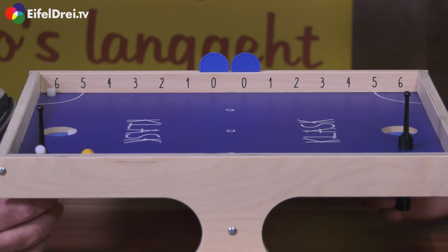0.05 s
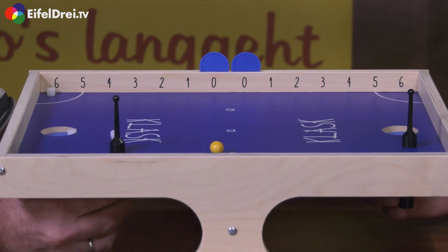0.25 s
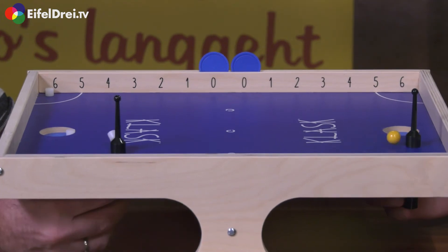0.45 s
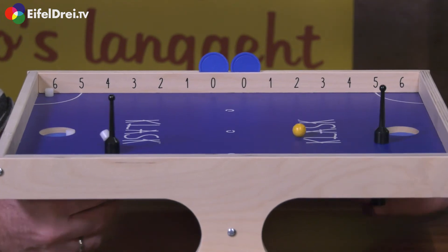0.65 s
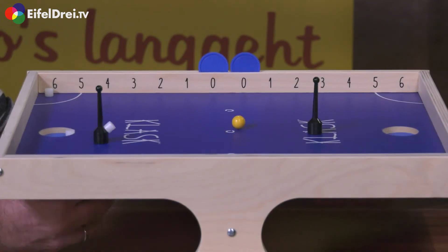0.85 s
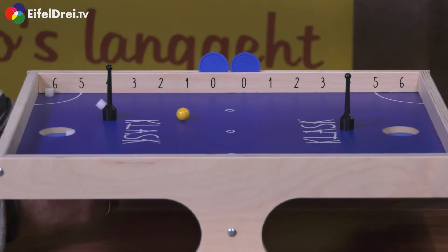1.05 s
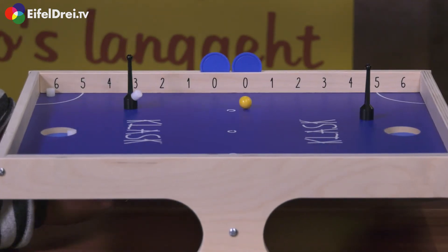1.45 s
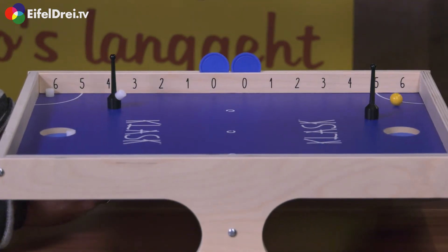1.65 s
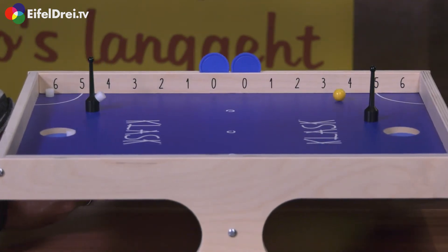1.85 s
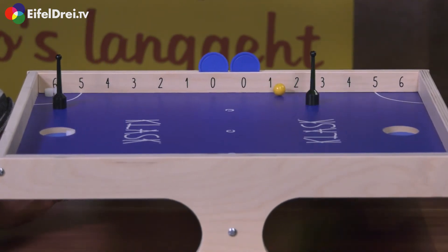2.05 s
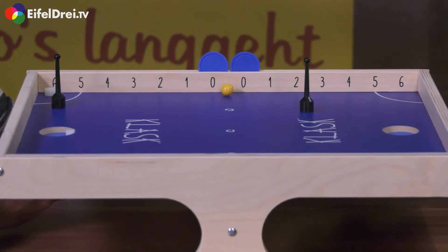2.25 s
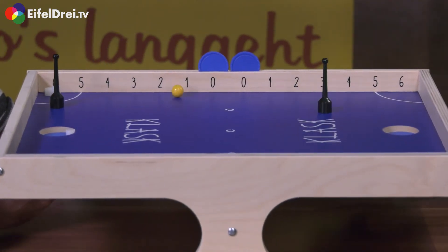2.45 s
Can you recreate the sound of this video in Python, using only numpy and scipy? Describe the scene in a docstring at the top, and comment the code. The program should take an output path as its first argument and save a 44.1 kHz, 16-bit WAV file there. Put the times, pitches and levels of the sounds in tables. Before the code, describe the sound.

A small plastic ball is knocked around a wooden tabletop game in a quiet room. A striker scrapes at 0.2 seconds, then the ball skips and cracks sharply around 0.6, bouncing on as the hollow board booms softly. Scrapes run from 0.8 to 1.5, with a tiny squeak. Hard knocks land at 1.4 and 1.8 amid bounces and rolling. More scraping follows from 2.0, fading by 2.5.

```python
"""In a quiet room, a small plastic ball is knocked about a wooden tabletop game.
The magnet-held strikers stick and slip across the board in short scrapes, sometimes squeaking.
The ball rolls with a fine ticking while the hollow board booms under it. It cracks against
strikers and walls and skips in quick bounces; each hit is a short clatter plus the board's ring."""
import sys
import numpy as np
from scipy import signal
from scipy.fft import rfft, irfft
from scipy.io import wavfile
from scipy.ndimage import uniform_filter1d

SR = 44100
rng = np.random.default_rng(int(sys.argv[2]) if len(sys.argv) > 2 else 0)


def materialize(psi):
    """Save the field psi as 16-bit PCM at rate SR to the path in sys.argv[1].

    A 1-D psi becomes a single channel; in a 2-D psi each row is a channel.
    """
    bounded = np.clip(np.atleast_2d(psi).T, -1, 1)
    quanta = np.round(bounded * 32767).astype(np.int16)
    wavfile.write(sys.argv[1], SR, quanta)


N = 114660
TIME = np.arange(N) / SR
HZ = np.fft.rfftfreq(4096, 1 / SR)  # the frequencies at which tone colours are set


def amp(db):
    """Turns decibels into a volume multiplier."""
    return 10 ** (np.asarray(db) / 20)


def unit(x):
    """Scales a signal to an average (rms) size of 1."""
    return x / np.sqrt(np.mean(x ** 2) + 1e-20)


def curve(points, hz=HZ):
    """Joins (frequency, value) points into a curve, giving each octave about equal room."""
    freq, value = np.transpose(points)
    return np.interp(np.log(hz + 1), np.log(freq + 1), value)


def add(mix, start_s, sound):
    """Adds a sound to the mix at the given time."""
    part = mix[max(round(start_s * SR), 0):][:len(sound)]
    part += sound[:len(part)]


def colour(x, db):
    """Turns each frequency up or down by db, with no ringing ahead of the sound."""
    log_gain = np.log(amp(np.r_[db, db[-2:0:-1]]))
    response = np.exp(np.conj(signal.hilbert(log_gain)))
    taps = np.fft.ifft(response).real
    return signal.fftconvolve(x, taps[:len(db)])[:len(x)]


def wobble(rate_hz):
    """A smooth random wavering, mostly slower than rate_hz."""
    freq = np.fft.rfftfreq(N, 1 / SR)
    return unit(irfft(rfft(rng.standard_normal(N)) / (1 + (freq / rate_hz) ** 4), N))


def resonance(hz, width_hz):
    """Noise that rings around one pitch; the narrower, the more like a note."""
    freq = np.fft.rfftfreq(N, 1 / SR)
    return unit(irfft(rfft(rng.standard_normal(N)) / (1 + (2 * (freq - hz) / width_hz) ** 2), N))


def clicks(per_s, spread_db):
    """Tiny clicks of uneven size at random times."""
    size = amp(spread_db * np.minimum(rng.exponential(1, N), 4))
    return size * rng.choice([-1, 1], N) * (rng.random(N) < per_s / SR)


# tone colour of the room's air (frequency [Hz], relative level [dB])
AIR_COLOUR = [(15, -39), (25, -5.5), (59, -19.5), (86, -8.5), (122, -13), (173, -14), (240, -13.5),
              (305, -20), (871, -26), (1620, -17), (5430, -40), (15500, -39)]
# the notes of the hum (pitch [Hz], starting level [dB], final level [dB])
HUM_NOTES = [(56.4, -63, -66), (98.6, -72, -62.5), (123, -61.5, -78)]
def room_air(air_db=-58, hiss_db=-69, waver_rad=0.76, sway_db=2.5, side_db=-20):
    """Quiet air, slightly different in each ear, with a wavering low hum and a faint hiss."""
    hum = np.zeros(N)
    for hz, first_db, last_db in HUM_NOTES:
        level = amp(np.linspace(first_db, last_db, N) + sway_db * wobble(5.0))
        hum += level * unit(np.sin(2 * np.pi * hz * TIME + waver_rad * wobble(5.9)))
    middle, side = (unit(colour(noise, curve(AIR_COLOUR))) for noise in rng.standard_normal((2, N)))
    air = middle + amp(side_db) * np.array([side, -side])
    return hum + amp(air_db) * air + amp(hiss_db) * rng.standard_normal((2, N))


# striker squeaks (time [s], length [s], pitch [Hz], level [dB])
SQUEAK_EVENTS = [(0, 0.16, 1590, -59.5), (1.306, 0.016, 2857, -24.5), (2.369, 0.0065, 2860, -40),
                 (2.519, 0.086, 2436, -46.5)]
def squeaks(width_hz=220, overtone_db=-15):
    """Now and then a sliding striker locks onto one pitch, with a weaker one a fifth above."""
    out = np.zeros(N)
    for start, length, hz, db in SQUEAK_EVENTS:
        swell = signal.windows.tukey(round(length * SR), .5)
        tone = resonance(hz, width_hz) + amp(overtone_db) * resonance(1.5 * hz, width_hz)
        add(out, start, amp(db) * swell * unit(tone[:len(swell)]))
    return out


# how loud the board booms (time [s], level [dB])
BOOM_LEVELS = [(.1, -72.5), (.25, -72), (0.32, -43.5), (0.52, -61), (.66, -55), (.8, -55), (.92, -47),
               (1.05, -51.5), (1.2, -65.5), (2.6, -68.5)]
# the hollow board's own notes (pitch [Hz], width [Hz], relative level [dB])
BOARD_NOTES = [(298, 25, -9), (407.4, 40.5, 3.5), (594, 280, 2.5)]
def board_boom():
    """The hollow board booms under the rolling ball."""
    level_db = np.interp(TIME, *np.transpose(BOOM_LEVELS))
    return amp(level_db) * unit(sum(amp(db) * resonance(hz, width) for hz, width, db in BOARD_NOTES))


def patchy(x, depth_db):
    """Random pitches swell and fade, as they do when a striker moves over the board."""
    spectrum = signal.stft(x, nperseg=512, noverlap=384)[2]
    patches = uniform_filter1d(rng.standard_normal(spectrum.shape), size=3, axis=0)  # blur in pitch
    patches = uniform_filter1d(patches, size=7, axis=1)  # blur in time
    return signal.istft(spectrum * amp(depth_db * unit(patches)), nperseg=512, noverlap=384)[1][:N]


# one list of points per striker stroke; the last three columns are added to the level
# (time [s], level [dB], low rub [dB], higher rasp [dB], gritty treble [dB])
STRIKER_STROKES = [
    [(0.15, -55, -19, -15, -16), (0.205, -43.5, -10, -0.5, -16), (0.235, -36, -2.5, 3, -1),
     (0.26, -28, -6, -2.5, -4.5), (0.28, -22.5, -17, -11, -15), (0.3, -29, -15, -5.5, -19),
     (0.32, -33, -12.5, 3, -16), (0.36, -54.5, 14.5, -4, -13)],
    [(0.568, -54, -20, -6, -8), (0.58, -30, -30, -9, -6), (0.6, -37, -7, -10, 5),
     (0.614, -49.5, 2, -9, -13), (0.638, -26.5, -17, -3, -23), (0.66, -45, -19, -6, -10)],
    [(0.81, -42.5, 0, 6, -21), (0.842, -26.5, -9.5, -2.5, -3), (0.872, -30, -5.5, -5, -11),
     (0.895, -22, -10, -12.5, -7.5), (0.925, -29, -4.5, -1.5, -17.5), (1.0, -40.5, -14, 0, -14.5)],
    [(1.0, -34, -13, 0, -22), (1.02, -28.5, -12, -2.5, -11), (1.035, -19.5, -20, -10.5, -22.5),
     (1.064, -27, -3, -3.5, -12), (1.09, -22.5, -12, -14.5, -17), (1.14, -29, -9.5, -0.5, -12.5),
     (1.166, -20, -24.5, -10, -18.5), (1.188, -32.5, -14, -11, -28)],
    [(1.188, -30.5, -11, -5, -21), (1.206, -28, -27, -6, -13.5), (1.23, -34.5, -21, -4, -19.5),
     (1.27, -21.5, -38, -9, -28), (1.282, -34, -28, 4.5, -17.5), (1.318, -23.5, -34, -12, -29),
     (1.336, -33, -18, -6, -25), (1.38, -40, -11, -0.5, -13.5), (1.408, -26.5, -6, -6, -0.5)],
    [(1.414, -22, -13, -5, 4.5), (1.44, -35.5, -1.5, -15, -1.5), (1.495, -31.5, -10.5, -0.5, -14),
     (1.56, -50, -4, 1, -17)],
    [(2.018, -49, -4, 3, -10), (2.04, -23.5, -10, -8, -13.5), (2.06, -32, -8, -5, -16.5),
     (2.08, -22.5, -18, -4, -7.5), (2.125, -17.5, -19, -13, -19), (2.143, -30, -7.5, -8, -14),
     (2.178, -22, -13, -13.5, -24.5), (2.21, -39.5, -25, 5.5, -19)],
    [(2.21, -39, -27, -4, -18), (2.25, -36, -1, -24, -15), (2.275, -37, 3.5, 2, -7.5),
     (2.305, -40.5, 2, -2, -13), (2.328, -36, -21, 4.5, -4.5), (2.352, -54, -28, 7, -24),
     (2.395, -43.5, -40, 1.5, -15), (2.5, -57, -15, 2, -17)],
]
# very high fizz, one value per stroke (level compared with the grit [dB])
STROKE_FIZZ = [-11, -26, -15.5, -23, -20, -18.5, -11, -13]
# tone colours of the five layers of a scrape (frequency [Hz], relative level [dB])
BODY_COLOUR = [(500, -47.5), (900, -24), (1130, -7.5), (1350, -2), (1490, 0), (1610, 8), (1740, -0.5),
               (1950, -9), (2900, -21), (6000, -57), (12000, -89)]
RUB_COLOUR = [(100, -43), (300, -33), (500, -7), (700, -8.5), (850, 3), (1080, 11.5), (1400, 0.5),
              (3000, -67)]
RASP_COLOUR = [(1200, -32), (1950, -6.5), (2380, 2), (2650, -5), (2950, -4.5), (3500, -15), (6000, -28),
               (12000, -65)]
GRIT_COLOUR = [(2000, -13.5), (3400, 13.5), (4500, 12), (5500, 9), (6600, -5), (9000, -26), (14000, -56)]
FIZZ_COLOUR = [(4500, -14), (6500, 3.5), (9300, 0.5), (10500, -11), (12500, -11), (15500, -33)]
def scraping(body_db=-3.0, rub_db=-2, rasp_db=-3, grit_db=-4, fade_s=0.0081, chatter_db=1.52):
    """The strikers stick and slip on the board, chattering as they slide."""
    levels = np.zeros((5, N))
    for stroke, fizz in zip(STRIKER_STROKES, STROKE_FIZZ):
        times, db, rub, rasp, grit = np.transpose(stroke)
        fade = np.clip(np.minimum(TIME - times[0], times[-1] - TIME) / fade_s + .5, 0, 1)
        offsets = (body_db, rub + rub_db, rasp + rasp_db, grit + grit_db, grit + grit_db + fizz)
        levels += fade * amp([np.interp(TIME, times, db + offset) for offset in offsets])
    chatter = amp(chatter_db * wobble(rate_hz=109))
    out = np.zeros(N)
    for level, shape in zip(levels, (BODY_COLOUR, RUB_COLOUR, RASP_COLOUR, GRIT_COLOUR, FIZZ_COLOUR)):
        slips = patchy(clicks(per_s=9000, spread_db=2) * chatter, depth_db=2.5)
        out += level * unit(colour(slips, curve(shape)))
    return out


# how loud the ball rolls (time [s], level [dB])
ROLL_LEVELS = [(.17, -88), (.33, -38.5), (.55, -47), (.8, -41.5), (1.3, -48), (1.548, -40.5),
               (1.691, -48.5), (1.8, -47), (1.941, -42), (2.02, -42.5), (2.4, -49.5), (2.52, -54),
               (2.6, -47)]
# tone colour of its ticking (frequency [Hz], relative level [dB])
TICK_COLOUR = [(200, -41), (420, -20.5), (800, -16.5), (1100, -3), (1600, -6.5), (2150, -3.5), (2450, -4.5),
               (2950, -4), (3500, -10), (5000, -32), (9000, -39.5)]
def rolling():
    """The rolling ball ticks finely on the board."""
    level_db = np.interp(TIME, *np.transpose(ROLL_LEVELS))
    ticks = clicks(per_s=1500, spread_db=5)
    return amp(level_db) * unit(colour(ticks, curve(TICK_COLOUR)))


def hit(shape_db, decay_s, ring_db, rise_s=0.00057, hold_s=0.0015,
        ring_hz=1640, ring_rise_s=0.0012, ring_decay_s=.032):
    """Plastic meets wood: a brief clatter and the board's main note. A decay is a 60 dB fade."""
    t = np.arange(len(HZ)) / SR
    fall = amp(-60 * np.maximum(t - hold_s, 0) / decay_s)
    burst = rng.standard_normal(len(t)) * fall * np.minimum(t / rise_s, 1)
    spectrum = rfft(burst, 2 * len(t))
    spectrum /= np.sqrt(uniform_filter1d(abs(spectrum) ** 2, size=45) + 1e-12)  # even out chance peaks
    clatter = colour(irfft(spectrum)[:len(t)], shape_db)
    clatter /= np.sqrt(np.sum(clatter ** 2) / (SR * .006)) * 3  # same energy whatever the colour
    pitch = ring_hz * (1 + 0.024 * rng.standard_normal())
    ring = np.sin(2 * np.pi * pitch * t) * amp(-60 * t / ring_decay_s)
    return clatter + amp(ring_db) * ring * (1 - np.exp(-t / ring_rise_s))


# hard knocks (time [s], level [dB], woody boost [dB], board ring [dB], treble boost [dB],
# top edge [Hz], decay [s])
KNOCK_EVENTS = [(0.2436, -23, -10, -21, 5, 10000, .03), (0.5398, -17.5, -27, 10, -8, 6660, 0.019),
                (0.5954, -11, -4, 0.5, 1.5, 6030, 0.029), (0.6416, -11.5, 1, -3, -1.5, 6600, 0.029),
                (0.6515, -25, -8, 0, 7, 7100, 0.013), (1.4121, -11.5, 6, 3, -10, 11000, 0.029),
                (1.4201, -10.5, 23, -1, -25, 11000, 0.047), (1.4331, -15, 18.5, 1, -9, 10000, 0.016),
                (1.7771, -9, -12, -34, 3.5, 8600, 0.02), (1.7857, -20, 20, -16, 9, 9300, 0.086)]
# basic tone colour of a knock (frequency [Hz], relative level [dB])
CRACK_COLOUR = [(200, -48), (400, -23.5), (700, -15), (1200, -14.5), (1700, -5), (2500, 0), (3600, -7),
                (4700, -3.5), (7500, -11.5), (10500, -17), (16000, -28)]
# where the woody and treble boosts act (frequency [Hz], share of the boost [0 to 1])
WOODY_SHARE = [(150, 0.39), (400, 0.047), (650, 0.37), (1100, 1), (1800, 0.012)]
TREBLE_SHARE = [(3000, 0), (4500, 1)]
def knocks(ring_db=-7, edge_steepness=17.4, edge_floor_db=-26, bass_cut_hz=460):
    """The ball cracks against a striker or the wooden wall; the thin wood gives no bass."""
    out = np.zeros(N)
    for start, db, woody, ring, treble, edge_hz, decay_s in KNOCK_EVENTS:
        top_cut = 20 * np.log10(1 / (1 + (HZ / edge_hz) ** edge_steepness) + amp(edge_floor_db))
        shape = curve(CRACK_COLOUR) + woody * curve(WOODY_SHARE) + treble * curve(TREBLE_SHARE) + top_cut
        add(out, start, amp(db) * hit(shape, decay_s, ring + ring_db))
    return signal.sosfilt(signal.butter(3, bass_cut_hz, "high", fs=SR, output="sos"), out)


# the ball's landings (time [s], level [dB], board ring [dB], treble [dB])
BOUNCE_EVENTS = [(0.3457, -24.5, -31, -8), (0.3644, -21.5, -30, -17), (0.3791, -26, -34, -23),
                 (0.396, -18.5, -17, -27), (0.41, -22.5, -27, -55), (0.4253, -21, -24, -20),
                 (0.4408, -19.5, -26, -19), (0.4537, -25, -3, -16), (0.468, -26.5, 1, -13),
                 (0.493, -26.5, 7, -19), (0.5064, -24.5, -31, -14), (0.5228, -23, -5, -14),
                 (0.6813, -13, 0.5, -11.5), (0.714, -14.5, 0.5, -11), (0.7426, -16, -0.5, -8),
                 (0.7632, -16, -2.5, -15.5), (0.782, -18.5, -21.5, -19.5), (0.8, -20.5, -4, -22),
                 (0.826, -23, -12, -29), (0.8885, -34, -17, 1), (1.4549, -17.5, -16, -9),
                 (1.6281, -24.5, -17, -21), (1.6482, -23, -20, -22), (1.724, -22.5, -29, -29),
                 (1.7393, -28, -23, -24), (1.7488, -24, -40, -20), (1.7641, -22, -22, -11),
                 (1.8198, -13.5, -16, -19), (1.8457, -18, -37, -24), (1.868, -15, -25, -9.5),
                 (1.8861, -20.5, -2.5, -20), (2.1968, -19, -28, -13), (2.3768, -24.5, -1, -45)]
# basic tone colour of a landing (frequency [Hz], relative level [dB])
LANDING_COLOUR = [(100, -32.5), (400, -21.5), (800, -12.5), (1200, -20), (1800, -6.5), (2400, 3.5),
                  (3050, 2), (3600, -5), (5000, -11.5), (6500, -28.5), (16000, -70)]
def bounces(level_db=-1.0, ring_db=-2, treble_db=16):
    """The ball skips over the board, each landing a short hit."""
    out = np.zeros(N)
    for start, db, ring, treble in BOUNCE_EVENTS:
        shape = curve(LANDING_COLOUR) + (treble + treble_db) * curve(TREBLE_SHARE)
        add(out, start, amp(db + level_db) * hit(shape, decay_s=0.02, ring_db=ring + ring_db))
    return out


def snap(start_s=0.5405, db=-38, decay_s=0.015):
    """The second knock carries a thin, very high snap."""
    out, t = np.zeros(N), np.arange(len(HZ)) / SR
    # (frequency [Hz], relative level [dB])
    shape = curve([(8000, -27.5), (11000, -7.5), (13500, -12), (15500, -5)])
    burst = unit(colour(rng.standard_normal(len(t)), shape))
    add(out, start_s, burst * amp(db - 60 * t / decay_s))
    return out


# echoes off the frame, table and walls (delay [s], strength [0 to 1])
NEAR_ECHOES = [(.0088, 0.17), (0.0149, 0.14)]
# how long the room rings (frequency [Hz], time to fade by 60 dB [s])
ROOM_DECAY = [(200, 0.92), (1000, 0.5), (2800, 0.59), (4400, 0.94), (7500, 0.38), (9500, 0.36),
              (14000, 0.22)]
def room(x, tail_db, build_s=0.012):
    """The room adds two quick echoes and a fading tail of many blurred ones."""
    hz, t, noise = signal.stft(rng.standard_normal(SR), SR, nperseg=256)
    fall = amp(-60 * t / curve(ROOM_DECAY, hz)[:, None])
    tail = signal.istft(noise * fall, SR, nperseg=256)[1]
    tail *= np.minimum(np.arange(len(tail)) / SR / build_s, 1)
    tail *= amp(tail_db) / np.linalg.norm(tail)
    for delay, gain in NEAR_ECHOES:
        add(tail, delay, np.array([gain]))
    return x + signal.fftconvolve(x, tail)[:N]


def scene():
    """The game sits in the middle, almost the same in both ears."""
    sliding = scraping() + squeaks() + rolling() + board_boom()
    game = room(knocks() + snap(), tail_db=-11) + room(bounces(), tail_db=-9) + room(sliding, tail_db=-14)
    return (game + room_air()) * amp([[-.27], [.27]])


def record(dry):
    """Cuts away the very highest treble, above 16000 Hz."""
    low_pass = signal.firwin(511, 16000, window=("kaiser", 9), fs=SR)
    return signal.oaconvolve(dry, low_pass[None], "same")


dry = scene()
out = record(dry)
materialize(out)
```